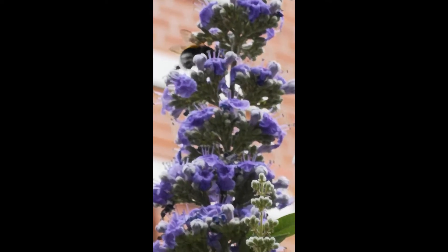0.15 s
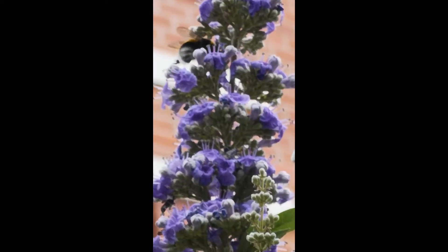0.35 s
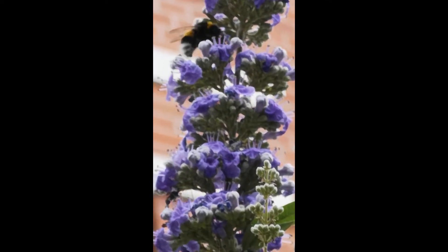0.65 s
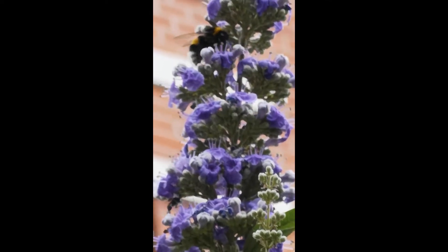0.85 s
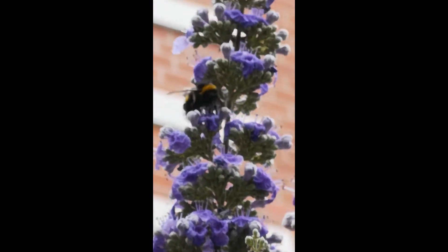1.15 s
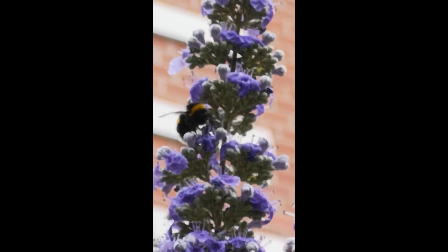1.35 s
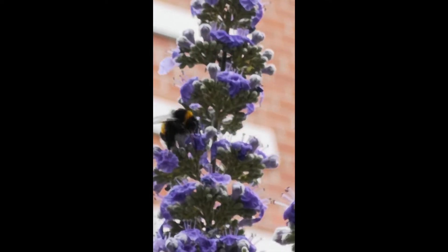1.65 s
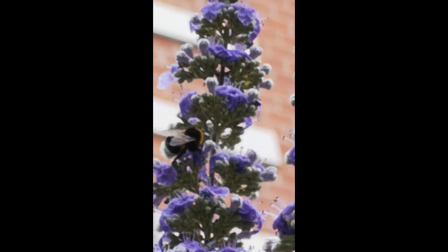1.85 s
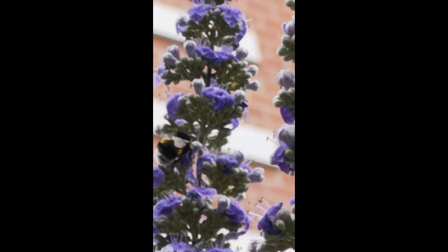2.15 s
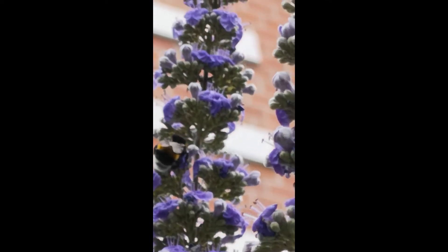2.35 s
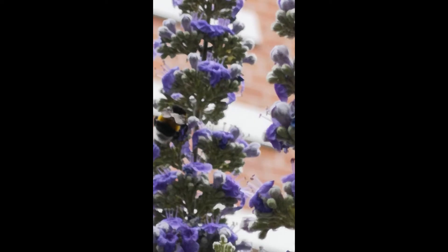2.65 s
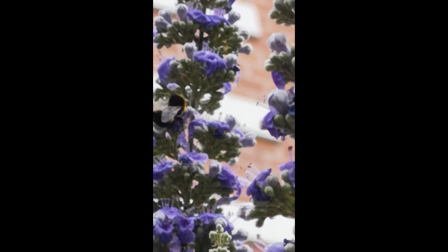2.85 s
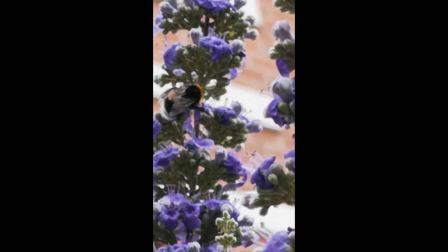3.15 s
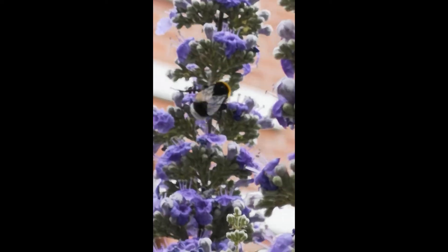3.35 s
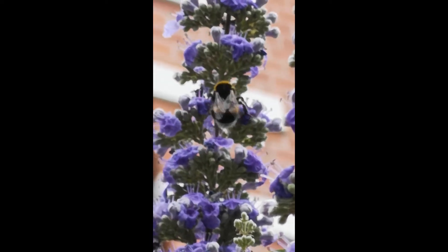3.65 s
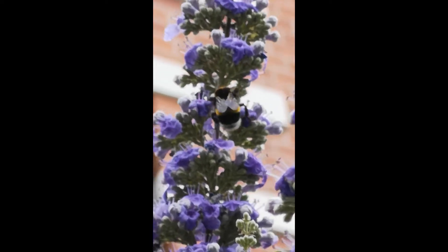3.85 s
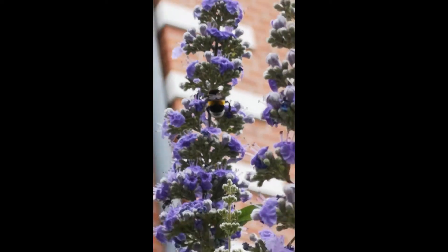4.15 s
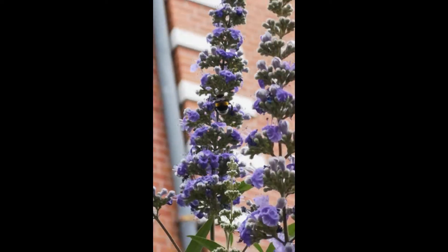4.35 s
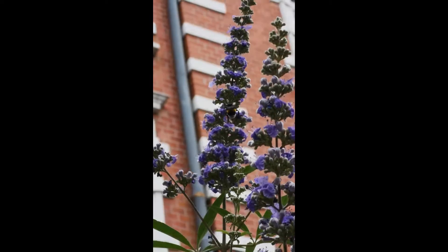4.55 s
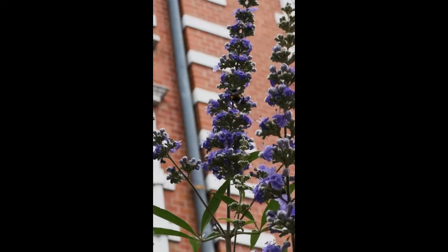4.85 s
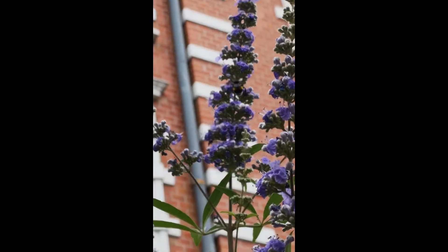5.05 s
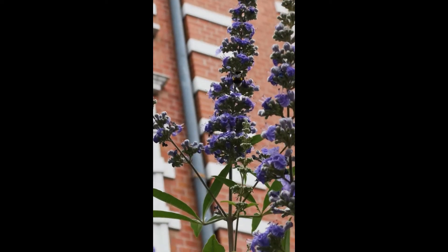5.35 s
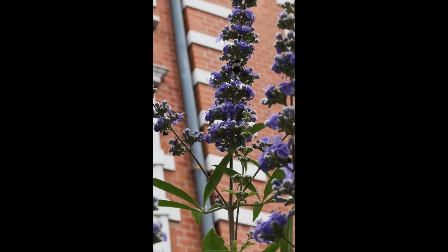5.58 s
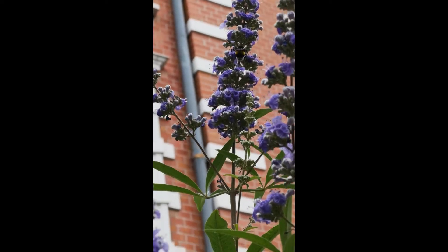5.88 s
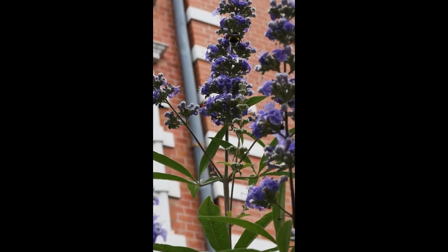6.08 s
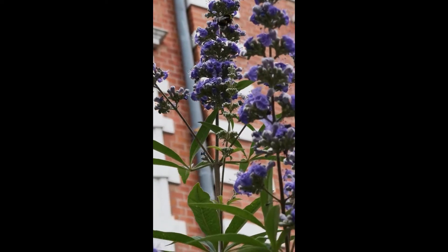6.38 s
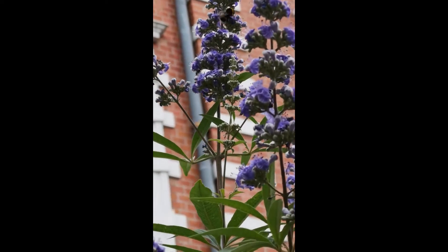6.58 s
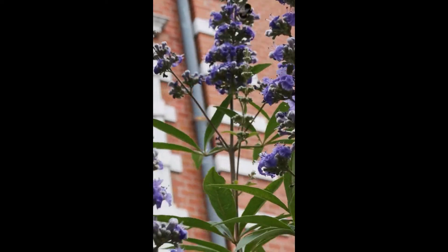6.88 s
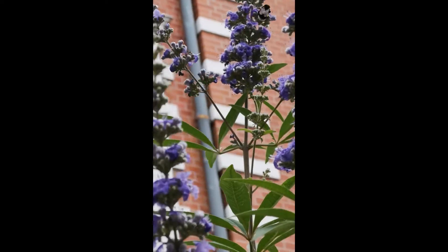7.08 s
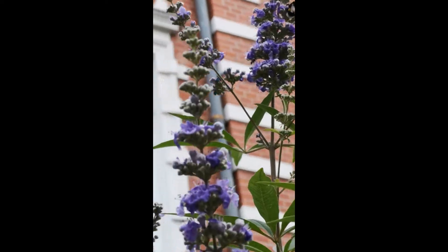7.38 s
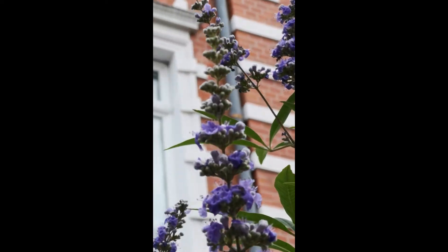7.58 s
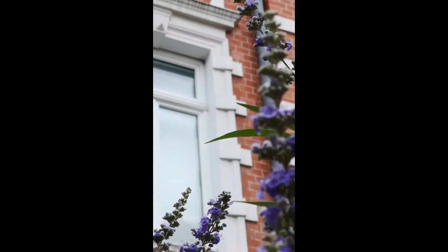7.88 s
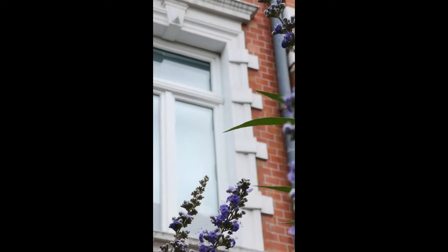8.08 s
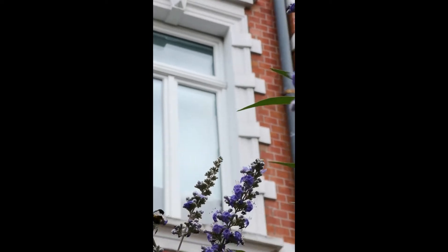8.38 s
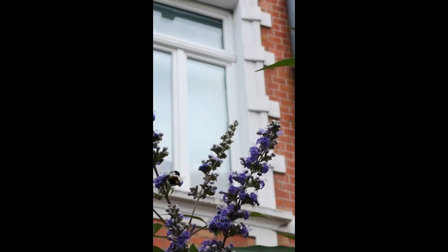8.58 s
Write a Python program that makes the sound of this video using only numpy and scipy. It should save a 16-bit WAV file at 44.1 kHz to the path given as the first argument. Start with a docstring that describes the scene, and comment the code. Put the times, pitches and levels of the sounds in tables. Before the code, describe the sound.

Outdoors by a flowering shrub on a town street, traffic rumbles, tyres wash past and an engine drones low. Several bumblebees hum in short hops; one takes off, its pitch rising, and skims the microphone with a big soft low throb. More distant hums follow, another engine idles deeply, then faint freewheel ticks and a tiny brake squeal end it.

```python
"""A town street: traffic rumbles and tyres roar as filtered noise, a breeze buffets the microphone, deep booms
swell and an engine drones on harmonics of its firing rate. Bumblebees and a higher-pitched fly or honeybee, sine
series on the wingbeat, hum at a flowering shrub; in the second second one bumblebee takes off and skims past the
microphone, others hum farther off and a short low boom falls in pitch. After five seconds another engine idles on
one deep wavering tone. Near the end noise bursts tick faintly, like a coasting bicycle, and a brake squeals thinly
on a few wavering sine modes."""
import sys
import numpy as np
from scipy import signal
from scipy.fft import rfft, irfft, next_fast_len
from scipy.io import wavfile
from scipy.ndimage import uniform_filter1d, map_coordinates

SR = 44100
rng = np.random.default_rng(int(sys.argv[2]) if len(sys.argv) > 2 else 0)


def generate_wav(sig):
    """Save sig (samples, or channels by samples) to the path in sys.argv[1] as 16-bit PCM at SR."""
    pcm = np.round(np.clip(np.atleast_2d(sig).T, -1, 1) * 32767).astype(np.int16)
    wavfile.write(sys.argv[1], SR, pcm)


N = 384673

# Spectra of the noise sources, relative: frequency_hz, density_db (per Hz)
BUFFET_SPECTRUM = [(12, -15), (25, -4), (45, 1), (70, -5.5), (100, -7), (160, -20.5), (400, -79)]
TOWN_SPECTRUM = [(100, 8.5), (200, 8), (400, -20.5), (650, -10.5), (1150, -3), (1600, -2.5), (2400, -27),
                 (6000, -77)]
RUMBLE_SPECTRUM = [(40, -36), (80, -4.5), (120, 0), (190, -2), (260, -2), (350, -5), (460, -14.5),
                   (650, -14.5), (1000, -16), (2500, -56.5)]
ROAR_SPECTRUM = [(400, -35), (700, -21), (950, -8.5), (1150, -9), (1400, -6), (1700, -0.5), (1950, 3),
                 (2400, -4.5), (3000, -34), (4200, -44), (8000, -91)]
HOLLOW_SPECTRUM = [(200, -31), (450, -4), (620, -4), (830, 0), (1100, -5), (2500, -72)]
TREAD_SPECTRUM = [(600, -45), (950, -17.5), (1180, -6), (1400, -12.5), (2500, -85)]
SIZZLE_SPECTRUM = [(500, -56), (1500, -19.5), (2100, 1), (2550, 2.5), (3000, -4.5), (3450, -9.5),
                   (4200, -17), (8000, -51)]
TYRE_HISS_SPECTRUM = [(1200, -61), (2500, -12), (4000, -3), (5000, 0.5), (7600, -1), (8300, -4.5),
                      (9500, -8), (11500, -21), (13000, -23.5), (15000, -23.5)]
# Level difference of the two microphone ports: frequency_hz, left_minus_right_db
PORT_BALANCE = [(300, -0.5), (450, 1), (680, 3.5), (1000, 1.5), (1350, -2.5), (1850, -8.5), (2600, -6.5),
                (3400, -4.5), (4200, 3), (5500, 6), (7700, 8), (8800, -5.5), (10500, -6), (15000, -6)]
# Likeness of the two ports: frequency_hz, coherence (0-1)
PORT_COHERENCE = [(100, 1), (200, 1), (300, 0.92), (500, 0.7), (800, 0.42), (1300, 0.36), (1900, 0.54),
                  (2500, 0.64), (3500, 0.76), (4500, 0.092), (6500, .03)]
# Phase lead of the left port: frequency_hz, lead_rad
PORT_LEAD = [(100, 0.5), (300, 0.73), (420, 1.64), (520, 2), (650, 2.5), (900, 1.1), (1300, -0.23),
             (1650, 0), (1950, 3.0), (2500, 3.5), (3000, 5), (3500, 5.5), (4200, 9)]

# Gusts on the microphone: centre_s, half_width_s, level_db
GUSTS = [(1.55, 0.16, -30.5), (2.12, 0.32, -33.5), (3.45, 0.93, -36.5), (4.95, 0.23, -31.5),
         (5.95, 0.1, -35)]
CALM_DB = -41  # the air between gusts
# Short deep booms: start_s, rise_s, fall_s, pitch_hz, level_db
BOOMS = [(.78, 0.058, .06, 52, -27), (1.2, 0.064, 0.16, 24.05, -30.5), (1.44, 0.067, 0.11, 54.9, -29),
         (4.92, 0.099, 0.13, 48.3, -27), (7.11, 0.06, 0.094, 57.7, -33.5)]

# Low rumble of the traffic: time_s, level_db
RUMBLE_LEVEL = [(0, -42), (1.0, -42.5), (2.0, -41.5), (3.3, -43), (4.7, -42), (6.2, -44), (7.35, -42),
                (8.1, -47.5), (8.72, -52)]
# Tyre roar of the stream, before a constant lift: time_s, level_db
ROAR_LEVEL = [(0, -42.5), (1.4, -38.5), (2.0, -41), (2.7, -41), (3.3, -43.5), (4.7, -39.5), (5.2, -41.5),
              (5.85, -41), (6.6, -47), (7.35, -45.5), (8.2, -50)]
# Cars going by: nearest_s, half_width_s, sizzle_db, hiss_db, tread_song_db, hollow_rush_db, resonance_hz
CARS = [ (0.24, 0.37, -42, -50.5, -53.5, -50.5, 2750), (0.75, 0.55, -43.5, -52, -54.5, -48, 3360),
        (1.55, 0.33, -42, -59, -50.5, -49, 3260), (2.52, 0.56, -43, -55.5, -46.5, -47.5, 3130),
        (3.85, 0.46, -46.5, -56.5, -67, -53.5, 2900), (4.45, 0.37, -49.5, -59.5, -55, -59, 3160),
        (5.3, 0.68, -45.5, -61, -51.5, -70, 2560), (5.84, 0.32, -44, -65, -51.5, -60, 3000),
        (7.02, 0.49, -51, -64.5, -69, -65, 2650), (7.43, 0.43, -48.5, -63.5, -57, -53.5, 2650), ]
CAR_FALLOFF = 1.82  # how steeply a car fades on either side
TYRE_WIDTH_HZ, TYRE_PEAK_DB = 260, -8.5  # tyre resonance: half width, strength against the plain sizzle
MID_PATCHY_DB = 1.2  # depth of the random patches in the tread song and the hollow rush

# Overtones of the drone: multiple, level_db, surge_extra_db, loss_db_per_s
DRONE_ORDERS = [(2, 14.8, 0, .35), (3, 6, 3.5, .9), (4, -2.5, 6, .7), (5, -4.5, 14, 1.2), (6, 1, 7, .8),
                (7, -9, 7, .9), (8, -16, 8, .5)]
# Firing tone of the droning engine: time_s, level_db
DRONE_TONE = [(0, -30), (.9, -32.5), (1.25, -43), (2.1, -46), (2.7, -33.5), (3.25, -34.5), (3.7, -41.5),
              (8.72, -60)]
# Common level of its overtones, before each one's own: time_s, level_db
DRONE_BODY = [(0, -53), (1.2, -51.5), (1.8, -49.8), (3.0, -51), (3.5, -54), (5.5, -56), (8.72, -60)]
DRONE_HZ = 59.8  # firing rate
DRONE_WAVER_DB, DRONE_WAVER_RAD = 1.9, .25
# The drone briefly turns harsher
SURGE_S, SURGE_RISE_S, SURGE_HOLD_S, SURGE_FALL_S = .3, .15, .15, .38
# Idling engine, before a constant trim: time_s, level_db
IDLE_LEVEL = [(5.1, -54), (5.28, -32.5), (5.8, -37), (6.02, -44), (6.2, -36), (7.05, -36), (7.42, -48),
              (7.55, -33.5), (8.25, -32), (8.7, -37)]
IDLE_START_S, IDLE_FADE_S, IDLE_HZ, IDLE_SAG_HZ_PER_S = 4.9, .2, 47.5, .9

# Ticks of the freewheel, before their colouring: start_s, strength_db
TICKS = [(6.724, -55), (7.135, -54), (7.378, -49.5), (7.497, -51), (7.627, -50.5), (7.755, -54),
         (7.874, -48), (8.0, -49.5), (8.125, -47.5), (8.251, -49.5), (8.375, -48), (8.499, -52),
         (8.622, -52)]
# Colour of a freewheel tick: frequency_hz, gain_db
PAWL_COLOUR = [(3000, -24), (5000, -8), (6100, 6), (6900, 0), (7800, 2), (9500, -5), (12000, -13),
               (15000, -9)]
TICK_T60_S, TICK_ATTACK_S = .07, .0022  # decay by 60 dB, time constant of the onset
# Brake modes, relative: pitch_hz, level_db, left_minus_right_db, waver_hz, upper_group_share (0-1)
BRAKE_MODES = [(4947, 1.5, 18, 7.6, 0.16), (5098, -6, 5, 9, 0), (10260, -3, -1, 23, 1),
               (10800, 0.5, -25, 19, 1), (10940, -4, 4, 30, 0.9), (14980, -8, -11, 90, 1)]
# Bites of the brake, before each mode's level: start_s, length_s, lower_modes_db, upper_modes_db
BITES = [(8.53, 0.035, -52.5, -53), (8.563, 0.072, -56, -65), (8.653, 0.061, -68, -56.5)]
BITE_EDGE_S = 0.021  # time over which a bite builds up and lets go

# Overtones of a hum, relative: multiple, level_db
HUM_OVERTONES = [(1, 0), (2, -14), (3, -28), (4, -37.5), (6, -41), (12, -52)]
TURN_DB, TURN_KNOTS_PER_S = 2.4, 9  # overtones flicker, as when a bee turns in the air
# Farther hums: hops of bumblebees, at 1.22 s a higher-pitched fly or honeybee, and at 4.66 s a short
# falling low boom:
# start_s, rise_s, hold_s, fall_s, pitch_hz, glide_hz_per_s, takeoff_spurt_hz, level_db, overtones_db
FARTHER_HUMS = [ (0.68, .08, .3, .14, 170, -4, 0, -42.5, -8), (0.95, .06, .2, .22, 115.2, 1, 0, -35, -13),
                (1.22, .06, .16, .1, 291, 12, 0, -48, -12), (3.52, .12, .06, .12, 172, -20, 0, -42, -5),
                (3.58, .08, .28, .14, 137, -30, 1, -39.5, -8), (4.0, .2, .2, .18, 128, -42, 0, -40, 5),
                (4.44, .09, .6, .35, 142, 15, 34, -36.3, -12), (4.66, .07, .1, .07, 104, -150, 0, -37, -15),
                (4.8, .15, .45, .25, 100, 2, 0, -40.5, 1), ]
SPURT_S = 0.0993  # time constant of a take-off spurt
# The close bumblebee's flight
CLOSE_START_S, CLOSE_RISE_S, CLOSE_HOLD_S, CLOSE_FALL_S = 1.62, .45, .2, 1.05
CLOSE_DB, CLOSE_OVERTONE_DB = -33.5, 2.5
# Its wingbeat climbs from take-off towards cruising speed with this time constant
TAKEOFF_HZ, CRUISE_HZ, CLIMB_S = 122.5, 149, 1.05
# It skims the microphone; the level is that of the air pushed by its wings
SKIM_START_S, SKIM_RISE_S, SKIM_FALL_S, SKIM_DB = 2.43, 0.4, 0.52, -20

TOP_HZ = 15400  # upper band limit


def amp(db):
    """Decibel law: level to amplitude gain."""
    return 10 ** (np.asarray(db) / 20)


def unit(x):
    """Normalisation: x scaled to rms 1."""
    return x / np.sqrt(np.mean(x ** 2) + 1e-20)


def along(points, hz):
    """Logarithmic scale: table values interpolated at hz (or at a multiple)."""
    f, v = np.transpose(points)
    return np.interp(np.log(hz + 1e-3), np.log(f), v)


def curve(rows):
    """Linear interpolation: a (time, value) table as one value per sample."""
    s, values = np.transpose(rows)
    return np.interp(np.arange(N) / SR, s, values)


def wobble(rate):
    """Random modulation: a smooth curve through normal random knots, rate knots a second."""
    knots = rng.standard_normal(int(N * rate / SR) + 4)
    coarse = np.arange(0, N, 32)
    smooth = map_coordinates(knots, [coarse * rate / SR])
    return np.interp(np.arange(N), coarse, smooth)


def turning(hz):
    """Phase accumulation: the running integral of a frequency curve."""
    return 2 * np.pi * np.cumsum(hz) / SR


def filtered(x, response):
    """Linear filtering: the spectrum of x times a response of frequency."""
    m = next_fast_len(N + SR // 4)
    return irfft(rfft(x, m) * response(np.fft.rfftfreq(m, 1 / SR)), m)[..., :N]


def panned(x, balance_db):
    """Level-difference stereo: mono spread by a left-right difference."""
    return np.array([x * amp(balance_db / 2), x * amp(-balance_db / 2)])


def since(start):
    """Elapsed time: seconds since start, 0 before it."""
    return np.maximum(np.arange(N) / SR - start, 0)


def arch(age, rise, fall, hold=0):
    """Sine envelope: a rounded rise, a hold and a rounded fall, resting a little above zero outside."""
    return np.sin(np.pi * np.interp(age, np.cumsum([0, rise, hold, fall]), [0.012, 0.53, 0.57, 0.99]))


def swell(s, width, falloff=2):
    """Spreading with distance: power of something going by, 1 at time s and less on either side."""
    return (1 + ((np.arange(N) / SR - s) / width) ** 2) ** -falloff


def level(swells, db):
    """Addition of powers: joint gain of several swells, each with its peak level."""
    return np.sqrt(amp(db) ** 2 @ np.array(swells))


def rush(spectrum, patchy_db):
    """Partial coherence: patchy street noise as two ports hear it; their mean has rms 1."""
    hz, _, z = signal.stft(rng.standard_normal((2, N)), SR, nperseg=2048)
    # random gain, smoothed over frequency and then over time
    field = uniform_filter1d(rng.standard_normal(z.shape[1:]), size=14, axis=0)
    field = uniform_filter1d(field, size=6, axis=1)
    hz = hz[:, None]
    a, b = z * amp(along(spectrum, hz) + patchy_db * unit(field))
    # mixing two independent noises by this angle gives the wanted coherence
    turn = np.arccos(np.clip(along(PORT_COHERENCE, hz), 0, 1)) / 2
    shared, own = a * np.cos(turn), b * np.sin(turn)
    tilt = amp(along(PORT_BALANCE, hz) / 2) * np.exp(1j * along(PORT_LEAD, hz) / 2)
    ports = np.array([(shared + own) * tilt, (shared - own) / tilt])
    pair = signal.istft(ports, nperseg=2048)[1][:, :N]
    return pair / np.std(pair.mean(axis=0))


def microphone_hiss():
    """White self-noise: the faint even hiss of the microphones."""
    return amp(-75) * rng.standard_normal((2, N))


def breeze():
    """Wind buffeting: low noise in soft lumps, a little different at each port."""
    shared, own = filtered(rng.standard_normal((2, N)), lambda hz: amp(along(BUFFET_SPECTRUM, hz)))
    air = unit(shared + amp(-18.0) * np.array([own, -own]))
    gusts = level([swell(s, width) for s, width, _ in GUSTS], [db for *_, db in GUSTS])
    return air * np.hypot(gusts, amp(CALM_DB)) * amp(1.7 * wobble(8.3))


def booms():
    """Enveloped low tones: now and then a deep boom swells for a few cycles, alike at both ports."""
    out = np.zeros(N)
    for start, rise, fall, hz, db in BOOMS:
        tone = np.sqrt(2) * np.sin(turning(hz * (1 + 0.0306 * wobble(25))))
        out += amp(db) * arch(since(start), rise, fall) * tone
    return out


def tyre_sizzle(cars, sizzle_db, tyre_hz):
    """Resonance: upper tyre noise, stressed around each passing car's own frequency."""
    tyres = rush(SIZZLE_SPECTRUM, patchy_db=0.98) * amp(0.31 * wobble(13))
    sizzle = np.hypot(level(cars, sizzle_db), amp(-55.5)) * tyres
    for car, db, centre_hz in zip(cars, sizzle_db, tyre_hz):
        band = filtered(tyres, lambda hz: np.exp(-((hz - centre_hz) / TYRE_WIDTH_HZ) ** 2))
        # the power curve serves as gain, so the resonance is briefer than the sizzle
        sizzle += amp(db + TYRE_PEAK_DB) * car * band
    return sizzle


def traffic():
    """Sum of broadband sources: steady town, rumbling stream, and tyre noise swelling as cars go by."""
    cars = [swell(s, width, CAR_FALLOFF) for s, width, *_ in CARS]
    sizzle_db, hiss_db, tread_db, hollow_db, tyre_hz = np.transpose(CARS)[2:]
    roar_db = curve(ROAR_LEVEL)
    town = amp(-45.5) * rush(TOWN_SPECTRUM, patchy_db=0.6)
    rumble = amp(curve(RUMBLE_LEVEL)) * rush(RUMBLE_SPECTRUM, patchy_db=2.0)
    roar = amp(roar_db + 0.5 + 0.38 * wobble(15)) * rush(ROAR_SPECTRUM, patchy_db=1.04)
    hollow_gain = np.hypot(level(cars, hollow_db), amp(roar_db - 14.0))
    hollow = hollow_gain * rush(HOLLOW_SPECTRUM, MID_PATCHY_DB)
    tread = np.hypot(level(cars, tread_db), amp(-57.5)) * rush(TREAD_SPECTRUM, MID_PATCHY_DB)
    hiss_gain = np.hypot(level(cars, hiss_db), amp(-68.0)) * amp(0.32 * wobble(15))
    hiss = hiss_gain * rush(TYRE_HISS_SPECTRUM, patchy_db=1.6)
    return town + rumble + roar + hollow + tread + hiss + tyre_sizzle(cars, sizzle_db, tyre_hz)


def droning_engine():
    """Harmonic series on the firing rate: overtones waver on their way between the houses."""
    body_db = curve(DRONE_BODY)
    surge = arch(since(SURGE_S), SURGE_RISE_S, SURGE_FALL_S, SURGE_HOLD_S)
    phase = turning(DRONE_HZ * (1 + 0.0029 * wobble(8)))
    drone = amp(curve(DRONE_TONE) + 0.91 * wobble(2.6)) * np.sin(phase)
    for k, db, surge_db, loss_db in DRONE_ORDERS:
        order_db = body_db + db + surge_db * surge - loss_db * since(0) + DRONE_WAVER_DB * wobble(7)
        order_phase = k * phase + DRONE_WAVER_RAD * wobble(6) + rng.uniform(0, 2 * np.pi)
        drone += amp(order_db) * np.sin(order_phase)
    return np.sqrt(2) * drone


def idling_engine():
    """Frequency modulation: one deep tone, unsteady and slowly sagging."""
    age = since(IDLE_START_S)
    idle_hz = (IDLE_HZ - IDLE_SAG_HZ_PER_S * age) * (1 + 0.02 * wobble(11))
    gain = amp(curve(IDLE_LEVEL) - 0.3 + 0.23 * wobble(7.4)) * np.minimum(age / IDLE_FADE_S, 1)
    return np.sqrt(2) * gain * np.sin(turning(idle_hz))


def freewheel():
    """Impact: a pawl drops with uneven force, each time with a short bright tick."""
    t = np.arange(SR // 10) / SR
    shape = amp(-60 * t / TICK_T60_S) * (1 - np.exp(-t / TICK_ATTACK_S))
    out = np.zeros((2, N + SR))
    for s, db in TICKS:
        first = round(s * SR)
        out[:, first:first + len(t)] += amp(db) * shape * rng.standard_normal((2, len(t)))
    return filtered(out[:, :N], lambda hz: amp(along(PAWL_COLOUR, hz)))


def brake():
    """Friction-driven modes: a rubbing pad sets thin steel singing, low and high modes by turns."""
    t = np.arange(N) / SR
    bites = []
    for s, length, *_ in BITES:
        inside_s = np.minimum(t - s, s + length - t)
        bites.append(np.clip(.5 + inside_s / BITE_EDGE_S, 0, 1) ** 2)
    lower, higher = (level(bites, db) for db in np.transpose(BITES)[2:])
    out = np.zeros((2, N))
    for hz, db, balance_db, waver_hz, upper in BRAKE_MODES:
        tone = np.sqrt(2) * np.sin(turning(hz + waver_hz * wobble(250)))
        drive = lower + upper * (higher - lower)
        out += panned(tone * drive * amp(db - 7.0 + 1.5 * wobble(80)), balance_db)
    return out


def hum(beat_hz, gain, overtone_db, jitter, flutter_db, near=0, count=12):
    """Periodic displacement of air: a fundamental and overtones; very near, only the fundamental grows."""
    phase = turning(beat_hz * (1 + jitter * wobble(30.2)))
    overtones = np.zeros(N)
    for k in range(2, count + 1):
        overtones += amp(along(HUM_OVERTONES, k)) * np.sin(k * phase + rng.uniform(0, 2 * np.pi))
    overtone_gain = gain * amp(overtone_db + TURN_DB * wobble(TURN_KNOTS_PER_S))
    stroke = (gain + near) * np.sin(phase) + overtone_gain * overtones
    return np.sqrt(2) * stroke * amp(flutter_db * wobble(9.8))


def farther_hums():
    """Gliding harmonic tones: bumblebees, a higher-pitched fly or honeybee, and one falling low boom."""
    out = np.zeros(N)
    for start, rise, hold, fall, hz, glide, spurt_hz, db, overtone_db in FARTHER_HUMS:
        age = since(start)
        glided_hz = glide * np.minimum(age, rise + hold + fall)
        beat_hz = hz + glided_hz + spurt_hz * np.exp(-age / SPURT_S)
        gain = amp(db) * arch(age, rise, fall, hold)
        out += hum(beat_hz, gain, overtone_db, jitter=0.0035, flutter_db=2.35)
    return out


def close_bumblebee():
    """Near field: a bumblebee takes off, speeds up its wings and skims the microphone."""
    age = since(CLOSE_START_S)
    beat_hz = CRUISE_HZ + (TAKEOFF_HZ - CRUISE_HZ) * np.exp(-age / CLIMB_S)
    near = amp(SKIM_DB) * arch(since(SKIM_START_S), SKIM_RISE_S, SKIM_FALL_S) ** 2
    gain = amp(CLOSE_DB) * arch(age, CLOSE_RISE_S, CLOSE_FALL_S, CLOSE_HOLD_S)
    return hum(beat_hz, gain, CLOSE_OVERTONE_DB, jitter=.002, flutter_db=.3, near=near)


def scene():
    """Superposition: the street behind, the hums in front."""
    street = microphone_hiss() + breeze() + booms() + traffic() + droning_engine() + idling_engine()
    hums = panned(farther_hums() + close_bumblebee(), balance_db=0.7)
    return street + freewheel() + brake() + hums


def record(dry):
    """Band limiting: nothing passes from the upper band limit upwards."""
    return filtered(dry, lambda hz: hz < TOP_HZ)


dry = scene()
out = record(dry)
generate_wav(out)
```